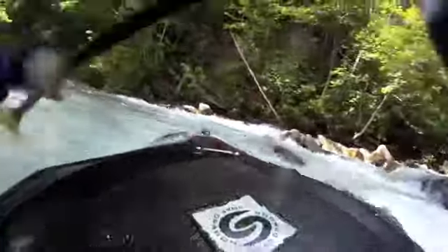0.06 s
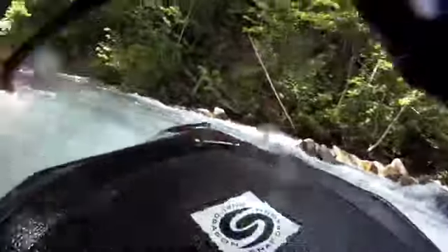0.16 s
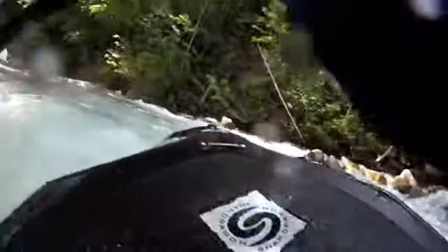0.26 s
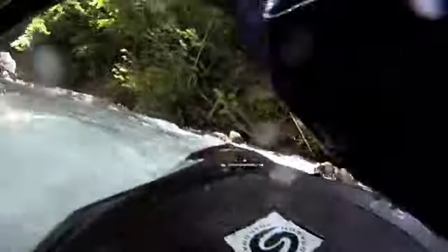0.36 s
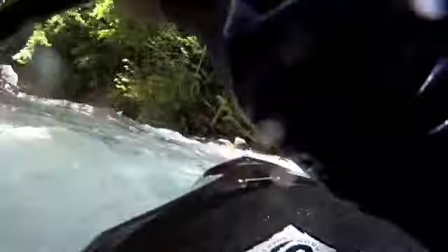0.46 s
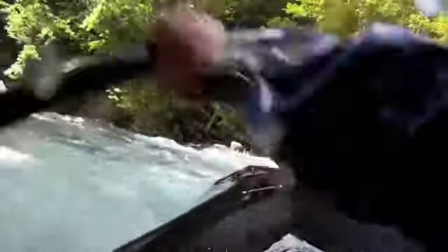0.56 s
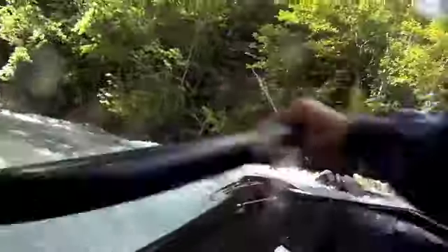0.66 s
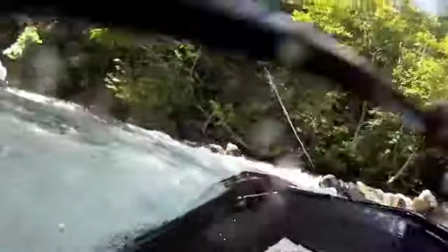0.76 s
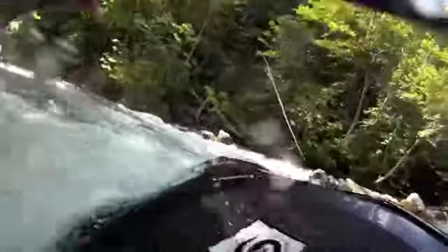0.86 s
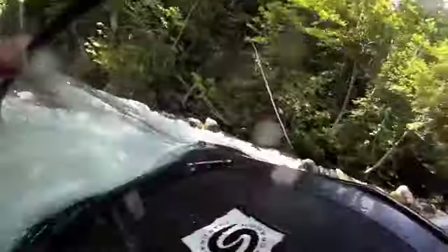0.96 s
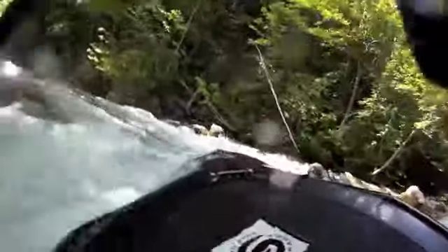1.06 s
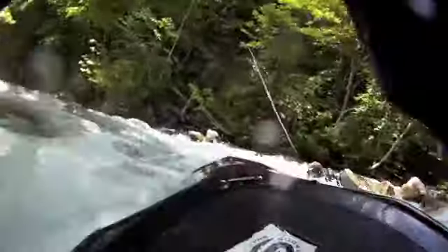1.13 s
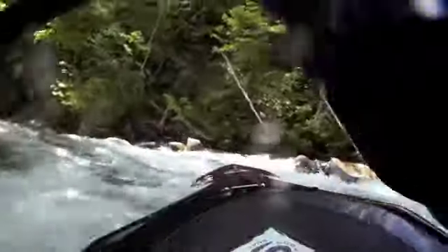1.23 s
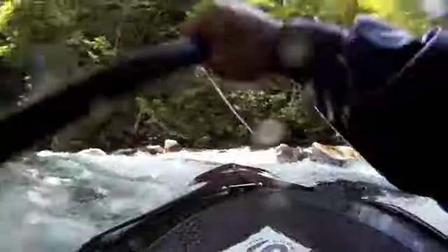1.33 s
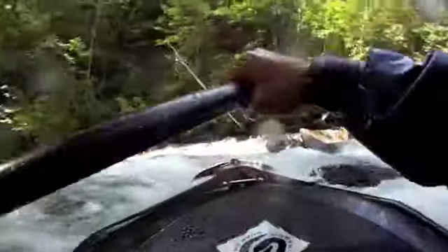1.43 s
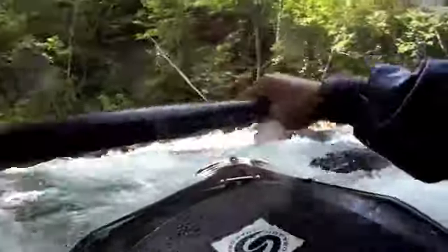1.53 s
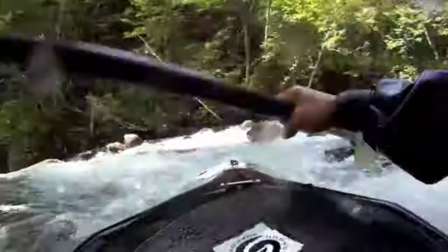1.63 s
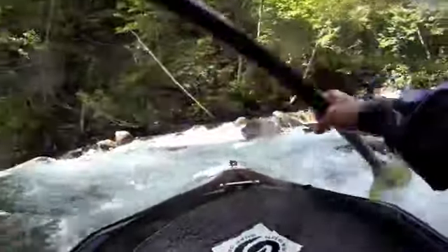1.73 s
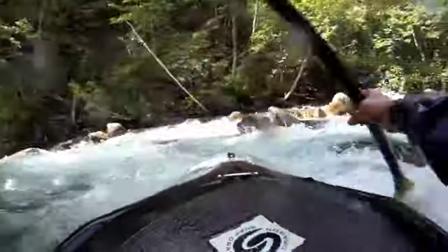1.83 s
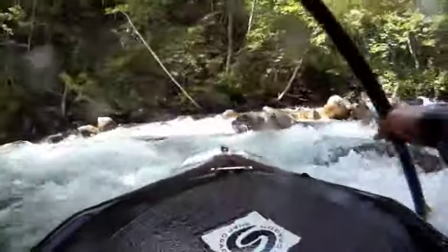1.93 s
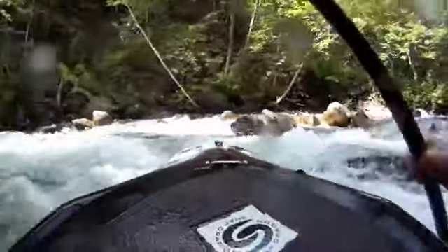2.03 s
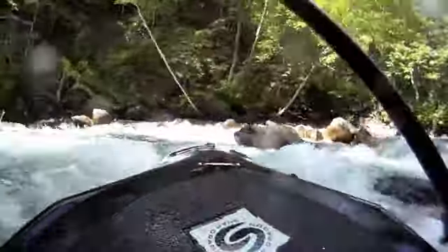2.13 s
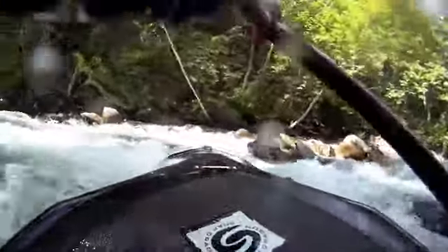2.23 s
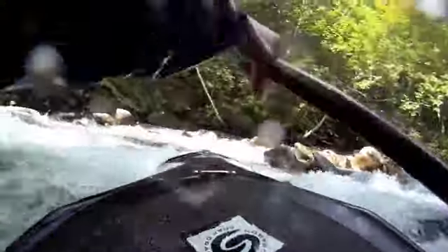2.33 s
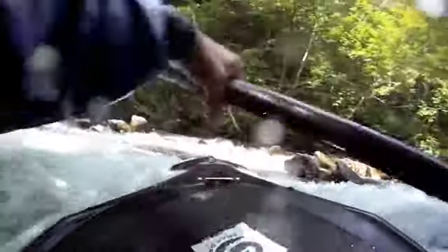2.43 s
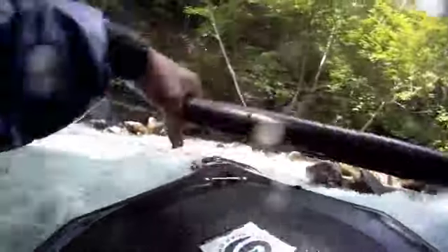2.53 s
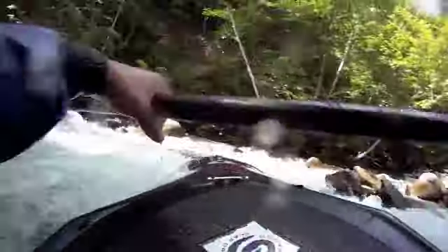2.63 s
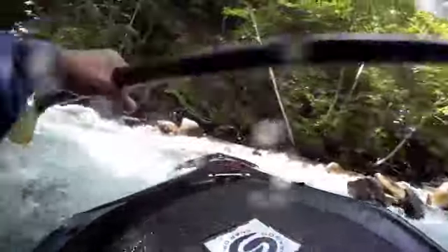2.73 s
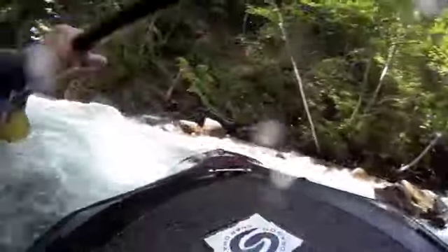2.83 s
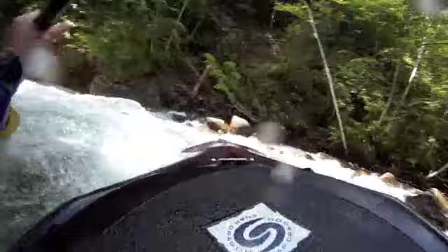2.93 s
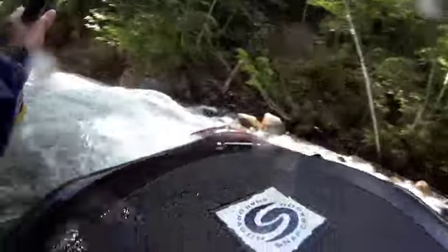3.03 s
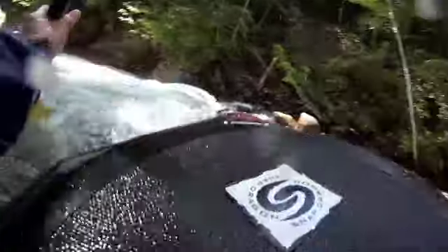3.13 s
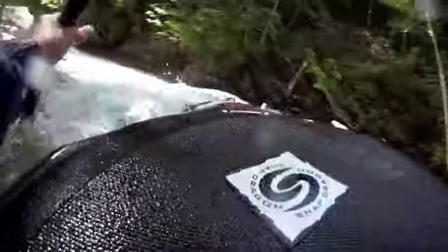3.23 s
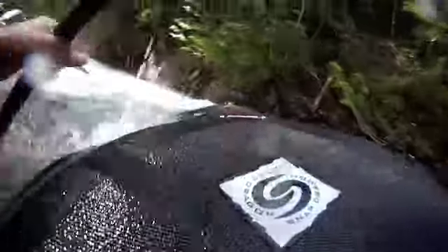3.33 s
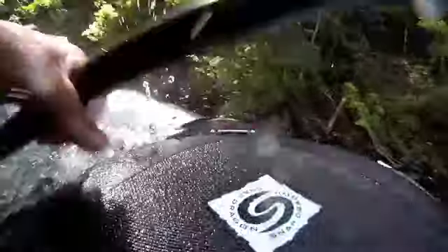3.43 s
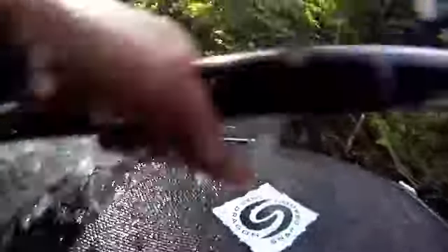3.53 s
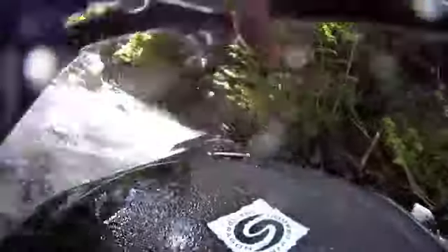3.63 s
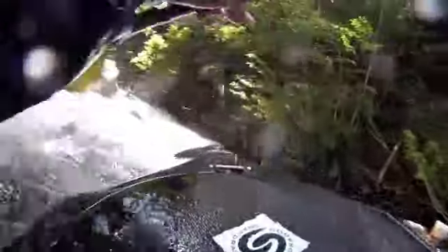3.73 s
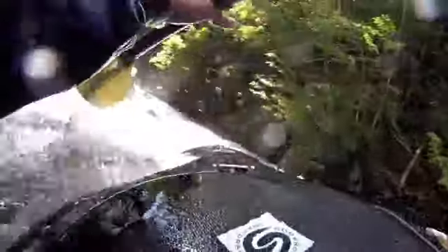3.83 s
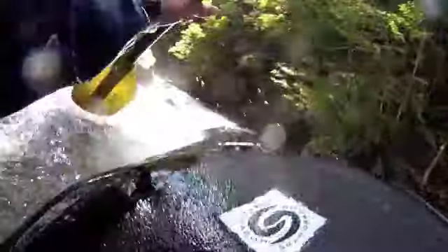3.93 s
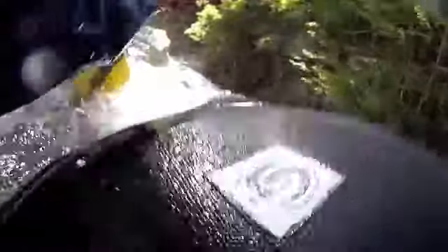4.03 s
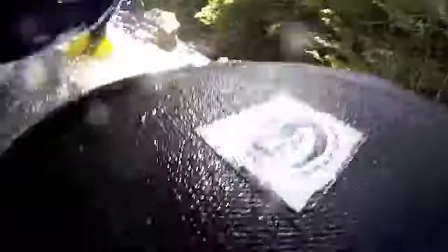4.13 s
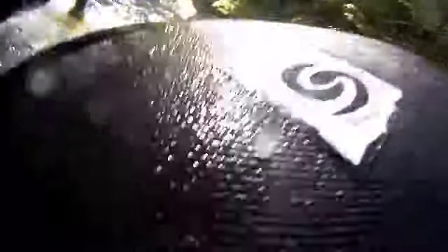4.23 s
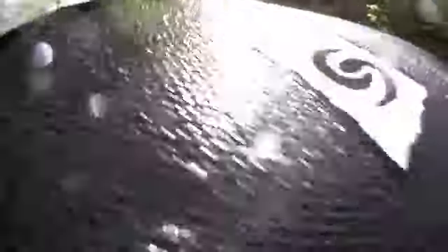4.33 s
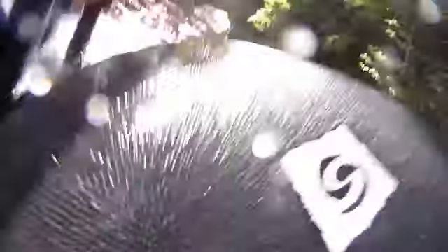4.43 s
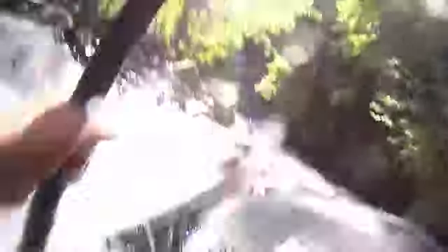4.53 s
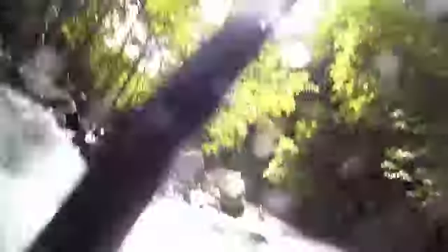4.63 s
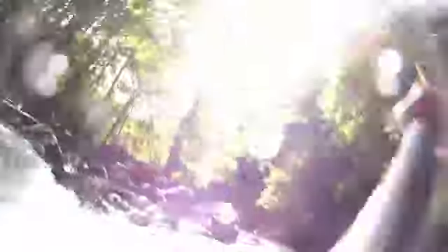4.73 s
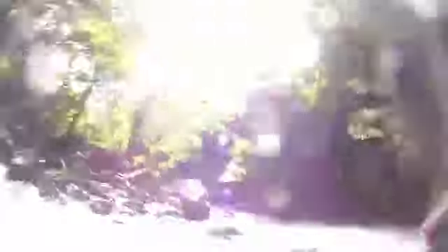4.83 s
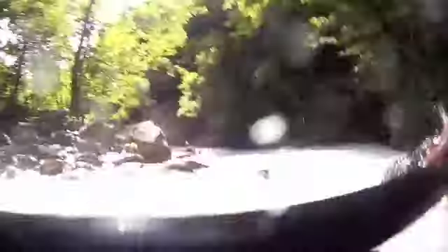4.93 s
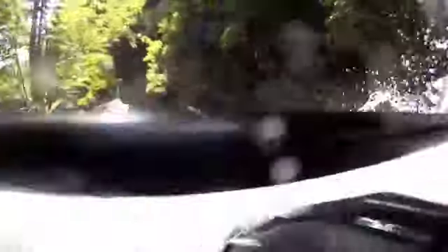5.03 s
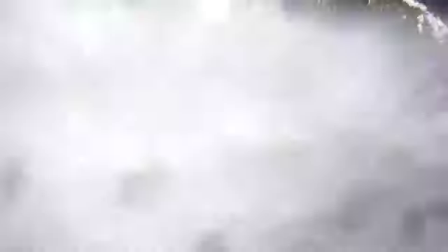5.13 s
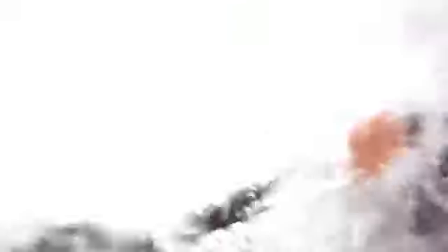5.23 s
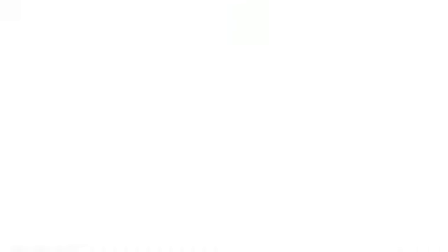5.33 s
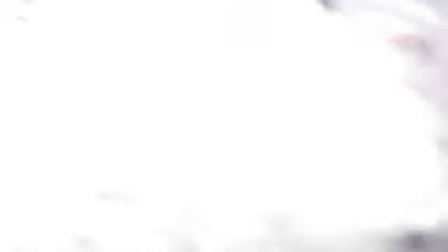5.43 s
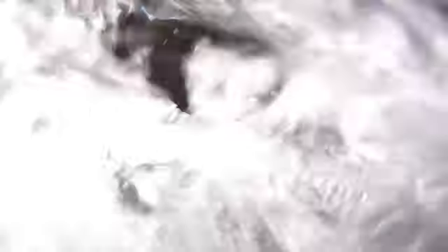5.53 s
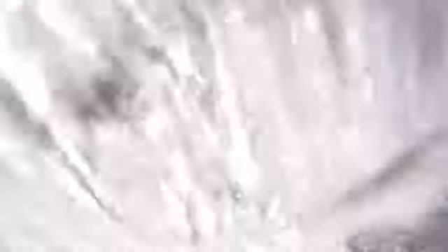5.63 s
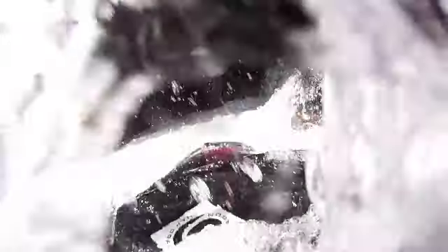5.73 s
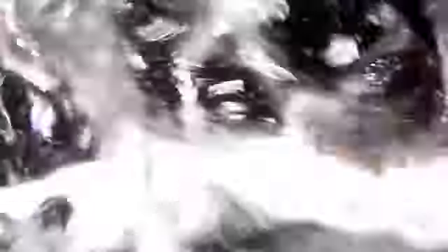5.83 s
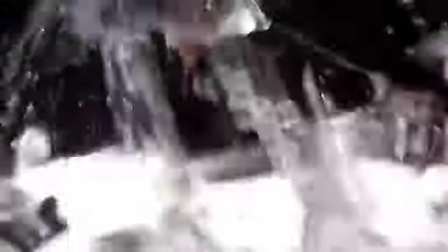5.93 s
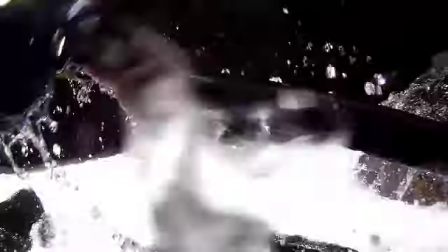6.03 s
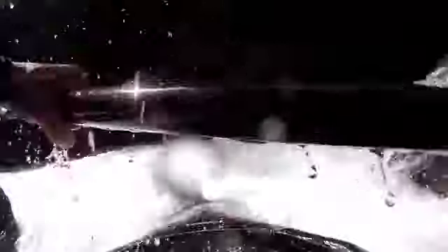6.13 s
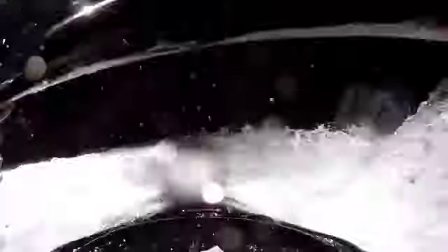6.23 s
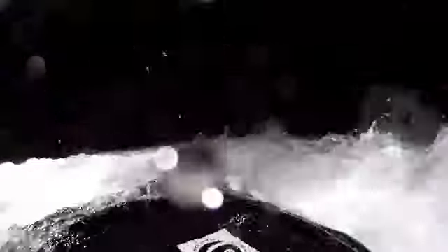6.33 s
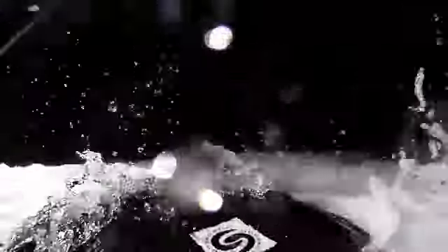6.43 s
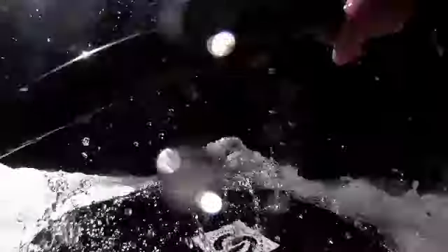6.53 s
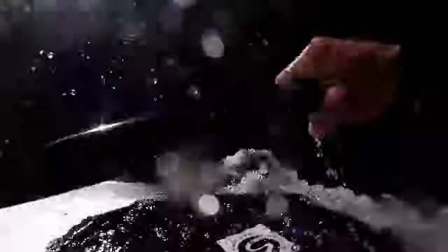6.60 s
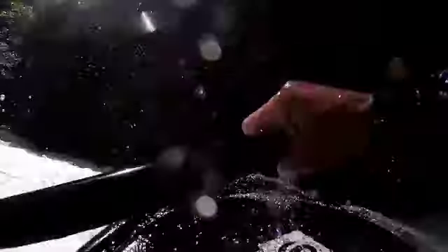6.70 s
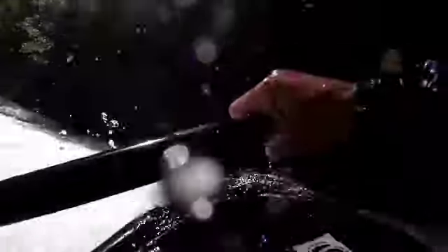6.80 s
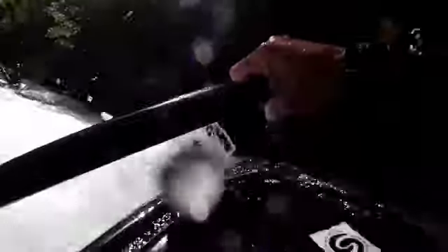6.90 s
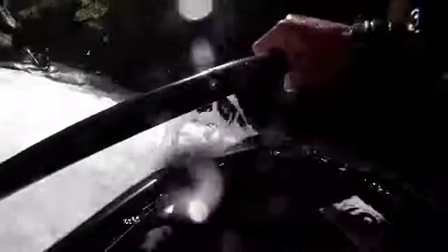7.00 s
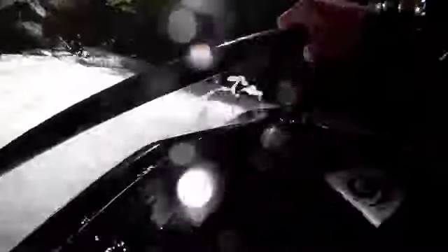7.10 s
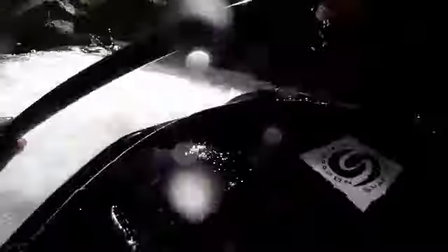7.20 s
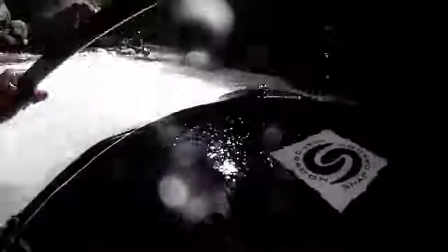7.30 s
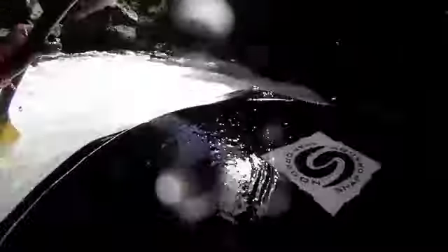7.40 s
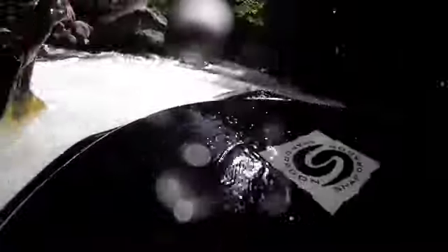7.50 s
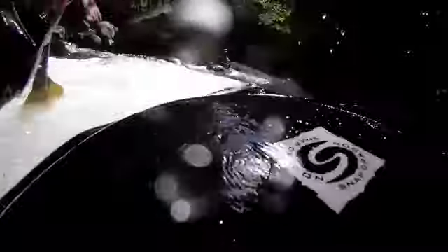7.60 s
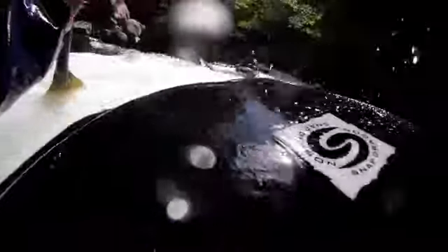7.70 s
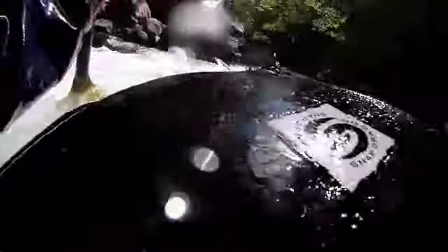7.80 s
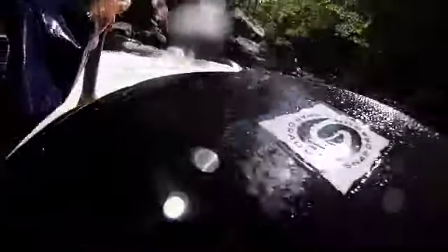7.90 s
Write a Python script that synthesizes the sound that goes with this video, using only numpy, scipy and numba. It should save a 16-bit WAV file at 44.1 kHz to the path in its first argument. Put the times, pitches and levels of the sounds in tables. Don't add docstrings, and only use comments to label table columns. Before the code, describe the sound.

Creek rapids roar dully from inside a sealed case, with drips and low thumps; a wave slams in with dense crackling spray, then subsides.

```python
import sys
import numpy as np
from scipy import signal
from scipy.fft import rfft, irfft
from scipy.io import wavfile
from scipy.ndimage import uniform_filter1d
from numba import njit

SR = 44100
rng = np.random.default_rng(int(sys.argv[2]) if len(sys.argv) > 2 else 0)


def linear_from_db(decibels):
    return 10 ** (np.asarray(decibels, float) / 20)


def store_wav(level_fs):
    pcm = np.round(np.clip(np.atleast_2d(level_fs), -1, 1) * 32767)
    wavfile.write(sys.argv[1], SR, pcm.T.astype(np.int16))


N = 351036

# time_s, level_db
WATER = [(0, -39), (.3, -40), (.9, -38.5), (1.6, -39.5), (2.9, -37.5), (3.5, -38), (4.3, -37.5), (4.4, -35),
         (4.85, -31.5), (5.05, -29), (5.11, -24.5), (5.3, -30.5), (5.73, -40), (5.85, -28.5), (5.92, -31.5),
         (6.35, -31), (6.88, -38), (7.96, -41)]
# time_s, deep_slosh_db, fine_mist_db
WAVE = [
    (1.5, 0, -0.3),
    (4.3, 0, -1.5),
    (5.05, 5, 2.5),
    (5.26, -8, -0.5),
    (5.35, 10.5, -5),
    (5.65, 2.5, -8.5),
    (5.75, -20, -3),
    (6.1, -0.5, 1),
    (6.45, -3.5, -1),
    (7, -1, 1.5),
]
# frequency_hz, density_db per Hz
SPRAY = [(150, -22), (250, -18), (322, -29), (387, -20), (703, -16), (954, -9.5), (1260, -4), (1800, -0.5),
         (2380, -1), (2790, -9.5), (3230, -3), (3690, -12.5), (4560, -13), (5420, -16), (5950, -21),
         (7740, -63), (13100, -120)]
TICK_ATTACK_S = .0005


def colour(x, points):
    hz, db = np.transpose(points)
    f = np.fft.rfftfreq(N, 1 / SR) + 1
    gain_db = np.interp(np.log(f), np.log(hz), db, left=-90, right=-90)
    y = irfft(rfft(x) * linear_from_db(gain_db), N)
    return y / np.sqrt(np.mean(y ** 2))


def curves(rows):
    s, *columns = np.transpose(rows)
    return [np.interp(np.arange(N) / SR, s, c) for c in columns]


def walk(rate):
    k = int(SR / rate)
    steps = np.repeat(rng.standard_normal(N // k + 1), k)
    return 2.02 * uniform_filter1d(uniform_filter1d(steps, k), k)[:N]


@njit
def pings(s, size, hz, length_s, splatter, rise, glide, hiss):
    out = np.zeros(N + SR)
    for e in range(len(s)):
        start, n = int(s[e] * SR), int(length_s[e] * SR) + 2
        for i in range(n):
            u = i / n
            ring = np.sin(2 * np.pi * hz[e] * i / SR * (1 + glide * (u - 1) / 2))
            shape = np.sin(np.pi * u ** rise) ** 2
            mixed = (1 - splatter[e]) * ring + splatter[e] * hiss[(start + i) % N]
            out[start + i] += size[e] * shape * mixed
    return out[:N]


def banded(points, swell_db, flicker_db, flicker_rate, deep_db=0, fine_db=0):
    noise = rfft(colour(rng.standard_normal(N), points))
    octave = np.log2(np.fft.rfftfreq(N, 1 / SR) + 1)
    out, shared = 0, walk(flicker_rate / 2)
    for centre in np.arange(8, 13, .5):
        band = irfft(noise * np.clip(1 - 2 * np.abs(octave - centre), 0, 1), N)
        shared = 1.08 * shared + 0.21 * walk(flicker_rate / 2)
        tilt_db = deep_db if centre < 10 else fine_db if centre >= 12 else 0
        out = out + band * linear_from_db(swell_db * shared + flicker_db * walk(flicker_rate) + tilt_db)
    return out


def patter(count, spread_db, cycles):
    when, pitch, rank, stretch = rng.random((count, 4)).T
    hz = 400 * 14 ** pitch
    size = linear_from_db(-spread_db * np.log(rank + 8e-3)) * np.sqrt(hz)
    length_s = cycles * (.5 + stretch) / hz
    return pings(when * N / SR, size, hz, length_s, np.zeros(count), 0.59, 0.16, np.zeros(N))


def sheets(rows):
    out = 0
    for s, rise_s, db, t60 in rows:
        age = np.arange(N) / SR - s
        fade_db = -60 * np.maximum(age - rise_s, 0) / max(t60, .005)
        rise = np.clip(age / max(rise_s, .001), 0, 1)
        out = out + (linear_from_db(db + fade_db) * rise) ** 2
    return out


def through_case(x):
    # centre_hz, width_hz, lift_db
    dry_ridges = [(1200, 340, 3), (1710, 220, 4), (2266, 230, 3.0), (3263, 450, 7.5)]
    wet_ridges = [(1170, 150, 3.5), (1500, 190, 6), (2040, 290, 5), (2400, 200, 1), (2780, 150, 7),
                  (3250, 250, 5.5), (4800, 490, 0.5)]
    soaked_s = 5.4
    f = np.fft.rfftfreq(N, 1 / SR)

    def resonate(ridges):
        lift_db = sum(db / (1 + (2 * (f - hz) / width) ** 2) for hz, width, db in ridges)
        return irfft(rfft(x) * linear_from_db(lift_db), N)

    return np.where(np.arange(N) < soaked_s * SR, resonate(dry_ridges), resonate(wet_ridges))


def water_gains():
    # start_s, rise_s, crest_db, t60_s
    surges = [
        (5.12, 0.09, -10.5, 0.4),
        (5.31, 0.01, -10, 0.72),
        (5.33, 0.058, -8, 1),
        (5.46, 0.079, -22, .7),
        (5.555, 0.016, -12.5, 0.66),
        (5.63, 0.044, -12, 0.3),
    ]
    # crest_s, level_db
    spatters = [(5.19, -13), (5.203, -15), (5.231, -12.5), (5.26, -18), (5.272, -28), (5.286, -25),
                (5.298, -25), (5.326, -9), (5.342, -12), (5.367, -19), (5.379, -11.5), (5.395, -13.5),
                (5.406, -15), (5.443, -14), (5.458, -14), (5.468, -19.5), (5.488, -15), (5.498, -23),
                (5.509, -26), (5.519, -18), (5.54, -16), (5.569, -14), (5.599, -13), (5.612, -12),
                (5.622, -16), (5.642, -17), (5.653, -22), (5.669, -14), (5.683, -18), (5.708, -19.5),
                (5.722, -24), (5.733, -28), (5.751, -26), (5.769, -30), (5.781, -25), (5.798, -23),
                (5.822, -22), (5.841, -24)]
    # start_s, peak_db, t60_s
    slaps = [
        (5.128, 1.5, 0.052),
        (5.136, -3.5, 0.13),
        (5.315, -4.5, 0.067),
    ]
    rise_s = .004
    bursts = [(s - rise_s, rise_s, db - 1.5, .055) for s, db in spatters]
    level = np.sqrt(linear_from_db(2 * curves(WATER)[0]) + linear_from_db(2 * -6) * sheets(surges) + sheets(bursts))
    cap_db, = curves([(3.6, -37.5), (6.5, -32)])
    roar_gain = np.minimum(level, linear_from_db(cap_db))
    slap_power = sheets([(s, .0017, db - 7.5, t60) for s, db, t60 in slaps])
    return roar_gain, np.sqrt(level ** 2 - roar_gain ** 2 + slap_power)


def parting():
    # start_s, length_s, level_db
    partings = [
        (5.029, 0.034, -43),
        (5.122, 0.032, -31),
        (5.11, 0.062, -50),
        (5.27, .04, -60),
        (5.475, 0.09, -53),
        (5.609, 0.018, -42),
        (5.693, 0.2, -48),
        (5.867, 0.0071, -18),
        (5.88, 0.1, -47),
    ]
    # frequency_hz, density_db per Hz
    dull = [(15, 3), (60, -9), (250, -19), (600, -27), (900, -60)]
    t = np.arange(N) / SR
    gate = sum(linear_from_db(db) * np.sin(np.pi * np.clip((t - s) / length_s, 0, 1)) for s, length_s, db in partings)
    return gate * colour(rng.standard_normal(N), dull)


def rapid(gain):
    # frequency_hz, density_db per Hz
    roar_points = [(150, 10.5), (250, -4.5), (448, -8), (532, -10), (993, -14.5), (1160, -8.5),
                   (1420, -8.5), (1730, -5.5), (1880, -5.5), (2320, 0), (2830, -7), (3280, -9), (4210, -15),
                   (4880, -13.5), (5950, -21), (7740, -61), (13100, -120)]
    deep_db, fine_db = curves(WAVE)
    roar = banded(roar_points, .3, .8, 24, deep_db, fine_db)
    bubbles = colour(patter(count=9000, spread_db=3.5, cycles=5.3), roar_points)
    return linear_from_db(-1.95) * gain * through_case(roar + linear_from_db(-8.5) * bubbles)


def strap():
    # frequency_hz, density_db per Hz
    rumble_points = [(8.8, -38), (15, -4), (32, 0), (48, -3.5), (218, -13), (255, -19), (285, -19),
                     (450, -29), (580, -41), (990, -120)]
    # centre_s, peak_db, length_s
    lurches = [(.06, -40, 0.18), (.18, -37.5, 0.19), (0.62, -34, 0.091), (0.79, -40, 0.064),
               (0.895, -29, 0.052), (1.04, -37.5, 0.38), (1.32, -48, 0.18), (2.19, -43, 0.17),
               (2.904, -54, .12), (3.125, -51, 0.045), (3.297, -33.5, 0.076), (3.442, -36, 0.061),
               (7.487, -37, 0.12), (3.948, -37, 0.035), (4.124, -39, 0.36), (4.376, -26, 0.15),
               (4.44, -34, .15), (4.555, -27, 0.12), (4.665, -32, 0.082), (4.753, -28.5, 0.14),
               (4.87, -24.5, 0.08), (5.027, -21, 0.082), (5.154, -28, 0.21), (5.386, -20.5, 0.16),
               (5.602, -23, 0.17), (5.725, -29.5, 0.39), (5.975, -29.5, 0.11), (6.768, -34, 0.44),
               (6.92, -37, 0.06), (7.698, -39.5, 0.66)]
    power = linear_from_db(2 * (-47 + 1 * (curves(WATER)[0] + 40)))
    for s, db, length_s in lurches:
        fade_db = 8.5 * 2 * np.abs(np.arange(N) / SR - s) / length_s
        power = power + linear_from_db(2 * (db - fade_db))
    rumble = colour(rng.standard_normal(N), rumble_points) * np.sqrt(power) * linear_from_db(1.0 * walk(25) - 2.5)
    pinned_s, freed_s, settle_s = 5.45, 6.6, 0.25
    free_db, pinned_db = 2.5, -9.5
    sway_db, = curves([(pinned_s - settle_s, free_db), (pinned_s, pinned_db),
                       (freed_s, pinned_db), (freed_s + settle_s, free_db)])
    sway = signal.sosfiltfilt(signal.butter(2, 50, fs=SR, output="sos"), rumble)
    return rumble + (linear_from_db(sway_db) - 1) * sway


def jolts():
    # centre_s, depth_db, pitch_hz
    dips = [(0.08, -26, 43.3), (0.121, -25.5, 95), (0.812, -33, 45), (0.917, -32, 55), (0.635, -28, 47),
            (0.901, -26, 85), (1.006, -31.5, 70), (1.833, -29, 70), (2.196, -24, 45.6), (3.117, -31, 47.7),
            (3.221, -29, 55), (3.298, -43, 65), (3.444, -27, 75), (3.942, -32, 56), (4.401, -25, 50),
            (4.537, -16.5, 127), (4.572, -30, 50), (4.679, -14.5, 51.5), (4.75, -21, 60), (4.766, -18, 60),
            (4.802, -24, 60), (4.84, -19.5, 36), (4.865, -26, 70), (5.001, -19, 60), (5.036, -20, 35),
            (5.038, -15, 70), (5.059, -16, 109), (5.083, -18, 70), (5.129, -15, 220), (5.138, -14, 170),
            (5.153, -16, 91), (5.17, -19, 65), (5.182, -16, 100), (5.384, -17, 62), (5.427, -20, 65),
            (4.907, -27, 60), (4.983, -24, 70), (4.435, -27, 70), (5.825, -22.5, 52), (6.493, -32, 68),
            (6.652, -30, 42.5), (6.693, -32, 49.3), (6.794, -37, 71), (6.909, -26, 75.5), (7.376, -36, 51),
            (7.688, -38.5, 55), (7.709, -30, 50), (7.742, -39, 56)]
    # centre_s, height_db, pitch_hz
    bumps = [(.093, -31, 45), (.165, -33, 50), (.195, -27, 80), (.624, -28, 70), (.647, -31, 55),
             (.793, -29, 55), (.893, -28, 90), (4.34, -22, 55), (4.384, -32, 60), (4.551, -23, 60),
             (4.804, -24, 55), (4.854, -21, 55), (4.884, -26, 70), (4.924, -26, 60), (5.014, -15, 86),
             (5.097, -16.5, 80), (5.326, -17, 70), (5.357, -24, 70), (5.375, -19, 70), (5.403, -24, 80),
             (5.417, -17.5, 75), (5.452, -23, 55), (5.589, -22, 60)]
    s, db, hz = np.transpose(dips + bumps)
    length_s = 1.5 / hz
    way = np.where(np.arange(len(s)) < len(dips), 1., -1.)
    return pings(s - length_s / 2, way * linear_from_db(db - 1.5), hz, length_s, 0 * s, 1.07, 0., np.zeros(N))


def gulps():
    # start_s, level_db, centre_hz, width_octaves, length_ms
    swallows = [(.357, -46, 1010, 1.6, 9.6), (.463, -36, 1140, 2.2, 16), (1.046, -32, 1260, 0.74, 5.2),
                (4.38, -32.5, 1600, 0.72, 43), (4.516, -30, 3160, 0.53, 30), (4.525, -34.5, 300, 2, 28),
                (4.71, -31.5, 1530, 1.2, 48), (4.83, -27.5, 1580, 1.17, 79), (4.995, -19.5, 1640, 1.1, 15),
                (5.012, -17, 1500, 1.35, 30.6), (5.07, -30, 1587, 0.51, 38), (5.1295, -18.5, 685, 0.66, 15),
                (5.1375, -6, 2780, 0.89, 8.6), (5.6, -22.5, 383, 1.3, 17), (5.879, -30, 1200, 0.3, 37),
                (6.289, -21.5, 2090, 1.25, 14.5), (6.388, -27, 1280, 1, 10.5), (6.1, -30, 2080, 0.13, 57),
                (5.91, -33, 2120, 0.55, 220), (6.33, -31.5, 2700, 0.61, 46), (5.79, -31, 1980, 0.49, 66)]
    # start_s, level_db
    sloshes = [
        (3.41, -45),
        (5.051, -33),
        (5.121, -27),
        (7.262, -49),
        (5.36, -32.5),
        (5.438, -34),
        (5.751, -48),
        (5.931, -52),
        (6.049, -50),
        (6.719, -41.5),
    ]
    # start_s, level_db, length_ms
    trickles = [(3.545, -45, 12), (6.529, -41.5, 43), (6.979, -39, 5), (7.151, -41.5, 8.7), (7.194, -43, 6),
                (7.31, -41, 7), (7.33, -45, 8), (7.41, -47, 5), (.395, -46, 7.7), (.582, -44, 6.5),
                (0.762, -39, 8), (.976, -44, 6)]
    rows = (swallows + [(s, db, 191, 0.87, 63) for s, db in sloshes]
            + [(s, db, 4500, 0.43, ms) for s, db, ms in trickles])
    out = np.zeros(N)
    for s, db, hz, octaves, ms in rows:
        edges = hz * 2 ** (np.array([-.5, .5]) * octaves)
        sos = signal.butter(3, edges, "band", fs=SR, output="sos")
        burst = signal.sosfilt(sos, rng.standard_normal(SR // 5))[SR // 10:]
        u = np.minimum(np.arange(len(burst)) / SR / (ms / 1000), 1)
        out[int(s * SR):][:len(burst)] += linear_from_db(db) * burst / burst.std() * np.sin(np.pi * u ** 0.88)
    return out


def drops():
    # start_s, peak_db, ring_hz
    drips = [
        (.022, -27, 2350),
        (0.449, -31, 2400),
        (0.481, -38, 2400),
        (.619, -30, 2310),
        (.859, -36, 2620),
        (1.054, -34, 2200),
        (1.228, -30, 2330),
        (4.52, -22, 3270),
        (6.695, -41, 2310),
        (7.296, -30, 2070),
    ]
    # start_s, peak_db, ring_hz, length_ms
    wave_drops = [(5.1386, 1.5, 3150, 3.1), (5.138, -22, 5000, 5.9), (5.118, -21, 2300, 6.9),
                  (5.269, -19, 1900, 11), (5.282, -22, 2200, 9.1), (5.311, -21, 1130, 8),
                  (5.169, -20, 2000, 6), (5.258, -15, 1910, 5.5), (5.315, -18, 2040, 4),
                  (5.375, -19, 2400, 3.5), (5.393, -8.5, 2350, 3.3), (5.563, -21, 1950, 21),
                  (5.608, -29, 424, 5.5), (5.6099, -3.5, 2420, 5), (5.607, -9.5, 1700, 8.6),
                  (5.667, -20, 2100, 8.3), (5.749, -18.5, 3600, 3.8), (5.768, -18.5, 1900, 4),
                  (5.779, -22, 1500, 6.4), (5.8692, -13, 2100, 3.4), (5.877, -23, 5100, 2.9),
                  (5.953, -22, 1430, 1.9), (6.213, -31, 1200, 4.7), (6.291, -23.5, 3240, 8),
                  (6.29, -24.5, 2100, 16)]
    # start_s, peak_db, ring_hz
    droplets = [(3.549, -37.5, 4030), (3.9755, -33, 4660), (4.5167, -34, 4280), (4.9367, -32, 4800),
                (5.0224, -28, 5030), (5.1083, -23, 4800), (5.1384, -29, 3960), (5.139, 1.5, 4800),
                (5.259, -25, 3840), (5.234, -22, 4500), (5.261, -28, 5100), (5.162, -19, 4670),
                (5.369, -14, 3700), (5.573, -23, 4600), (5.3144, -23, 4340), (5.374, -15.5, 4600),
                (5.4245, -17, 4100), (5.449, -24, 4190), (5.46, -19, 4380), (5.503, -24, 4370),
                (5.541, -16, 4580), (5.569, -25, 5300), (5.6306, -30, 4460), (5.6675, -16, 4300),
                (5.696, -16.5, 3960), (5.717, -22.5, 5100), (5.786, -29, 3880), (5.824, -27, 5200),
                (5.898, -23, 3960), (6.019, -31, 4750), (6.093, -32, 4840), (6.293, -39, 4220)]
    rows = ([(*row, 2.9, 0.26) for row in drips] + [(*row, 0.14) for row in wave_drops]
            + [(*row, 4, 0.43) for row in droplets])
    s, db, hz, ms, splatter = np.transpose(rows)
    hiss = colour(rng.standard_normal(N), SPRAY)
    length_s = np.clip(ms, .5, 30) / 1000
    return pings(s - .0005, linear_from_db(db + 6.0), hz, length_s, np.clip(splatter, 0, 1), 0.66, -0.13, hiss)


def ticks():
    # start_s, peak_db, ring_hz, t60_ms
    beads = [(.3622, -25, 1250, 6), (.4648, -24, 1050, 4.6), (0.4703, -30, 744, 5.9), (.471, -24, 1700, 12),
             (1.0417, -13.5, 1900, 8.2), (1.046, -18.5, 3270, 12), (1.045, -17, 1500, 6),
             (3.2742, -21, 3030, 16), (3.545, -22.5, 3270, 26), (5.129, -2, 900, 14),
             (5.1286, -6, 2400, 12), (5.133, -10, 1900, 12), (5.1381, 4, 3420, 18), (5.1407, 2, 2500, 8.5),
             (5.1435, -5, 3650, 19), (5.1465, -8, 2160, 38), (5.153, -15, 2130, 17), (5.159, -15, 2000, 20),
             (5.188, -12, 3080, 14), (5.202, -4.5, 2150, 12), (5.228, -7, 2400, 9.7),
             (5.296, -12, 1970, 25), (5.326, -8, 1720, 14), (5.343, -6, 2000, 12), (5.378, -5, 1500, 12),
             (5.389, -9, 1450, 16), (5.403, -14, 1400, 17), (5.465, -6.5, 2000, 24), (5.506, -9, 1300, 14),
             (5.5168, -1.5, 2700, 15), (5.537, -4, 2170, 13), (5.579, -16, 5250, 10),
             (5.598, -11, 1500, 18), (5.62, -14, 3170, 18), (5.634, -21, 5600, 7.3),
             (5.675, -5.5, 3050, 12), (5.707, -9.5, 2190, 12), (5.731, -11, 2300, 18),
             (5.858, -16, 2020, 23), (5.8768, -16, 2480, 11), (5.897, -30, 2170, 12),
             (5.9043, -6.5, 3370, 14), (5.905, -10, 1890, 13), (6.056, -11, 3080, 15),
             (6.292, -28, 1710, 18), (6.293, -22, 1200, 11), (5.869, -7.5, 1100, 11),
             (6.297, -12, 2040, 25), (6.324, -20, 2010, 16), (6.3925, -18, 2000, 11)]
    out, age = np.zeros(N), np.arange(SR // 20) / SR
    attack = np.minimum(age / TICK_ATTACK_S, 1)
    for s, db, hz, t60_ms in beads:
        decay = linear_from_db(db - 60 * age / (max(t60_ms, 2) / 1000))
        out[int(s * SR):][:len(age)] -= decay * attack * np.sin(2 * np.pi * hz * age)
    return out


def bead():
    start_s, peak_db, ring_hz, hold_s, t60_s = 5.8687, 1.5, 3340, .0022, .005
    age = np.maximum(np.arange(N) / SR - start_s, 0)
    fade_db = -60 * np.clip(age - hold_s, 0, .1) / t60_s
    attack = np.minimum(age / TICK_ATTACK_S, 1)
    return -linear_from_db(peak_db + fade_db) * attack * np.sin(2 * np.pi * ring_hz * age)


def spray(gain):
    deep_db, fine_db = curves(WAVE)
    grains = banded(SPRAY, .3, 1.2, 80, deep_db, fine_db) * linear_from_db(.7 * walk(300))
    grains = grains + linear_from_db(-1.75) * colour(patter(count=9000, spread_db=1.5, cycles=2.24), SPRAY)
    local_power = uniform_filter1d(grains ** 2, int(.007 * SR))
    evenness = .75
    evened = grains * (np.mean(grains ** 2) / local_power) ** (evenness / 2)
    return linear_from_db(-3.0) * gain * evened


def scene():
    roar_gain, spray_gain = water_gains()
    inside = rapid(roar_gain) + strap() + jolts() + gulps() + drops() + ticks() + bead() + spray(spray_gain)
    return inside + parting() * np.array([[1], [-1]])


def band_limit(x):
    return signal.sosfilt(signal.butter(12, 15830, fs=SR, output="sos"), x)


def record(dry):
    up, down = 40, 147
    slow = signal.resample_poly(np.clip(dry, -1.03, 1.03), up, down, axis=1)
    held = np.repeat(slow, 4, axis=1)
    out = signal.resample_poly(held, down, 4 * up, axis=1)[:, :N]
    top_cut = signal.ellip(12, .2, 60, 15250, fs=SR, output="sos")
    out = signal.sosfilt(top_cut, np.clip(out, -.93, .93))
    return band_limit(np.clip(out, -1, 1))


dry = scene()
out = record(dry)
store_wav(out)
```